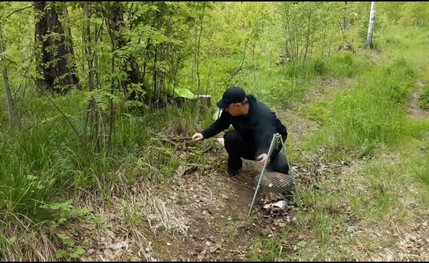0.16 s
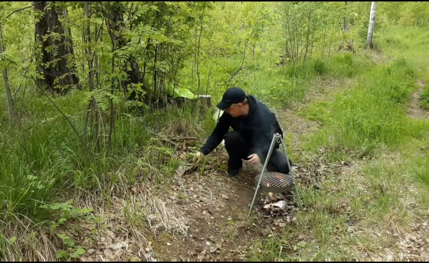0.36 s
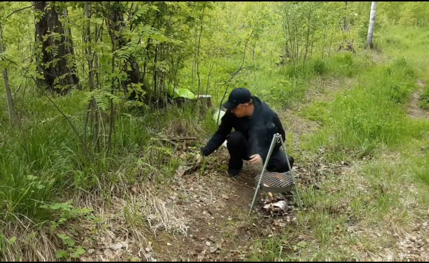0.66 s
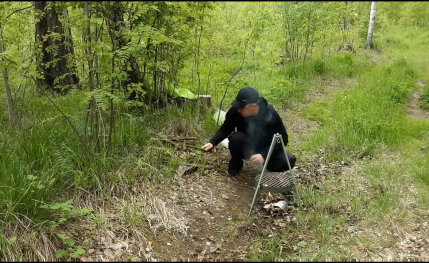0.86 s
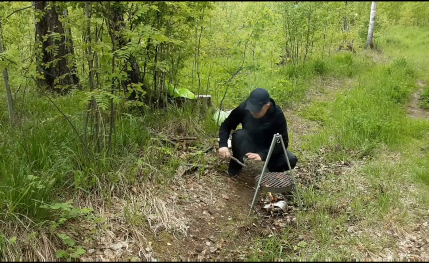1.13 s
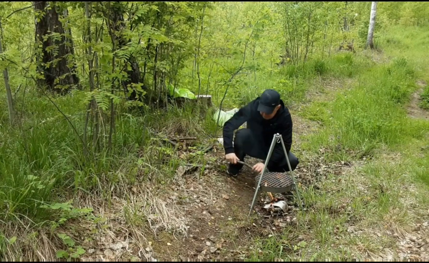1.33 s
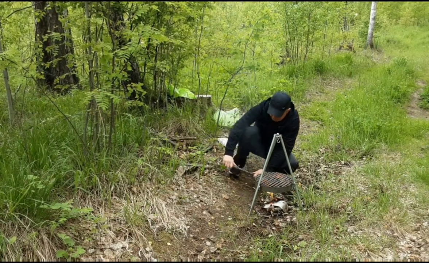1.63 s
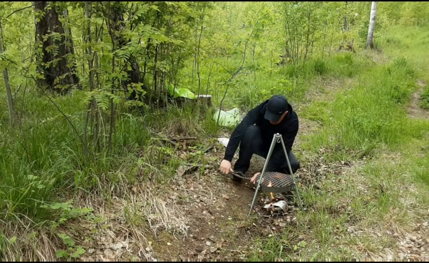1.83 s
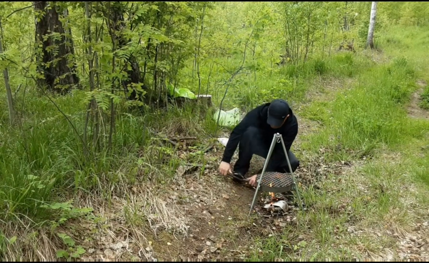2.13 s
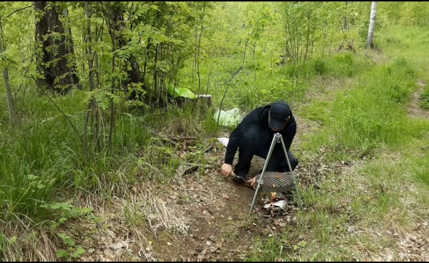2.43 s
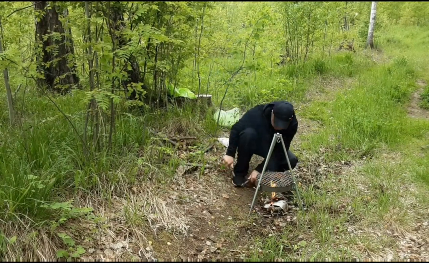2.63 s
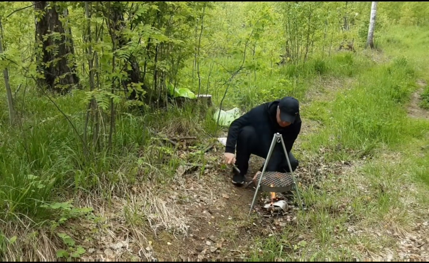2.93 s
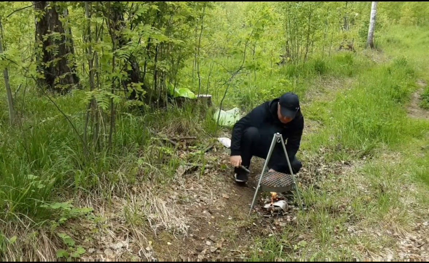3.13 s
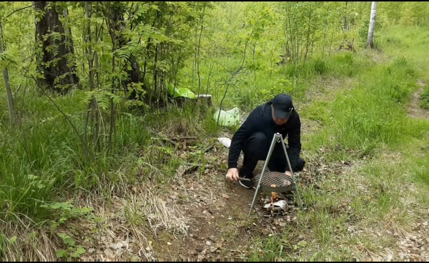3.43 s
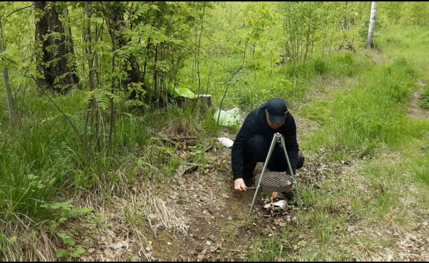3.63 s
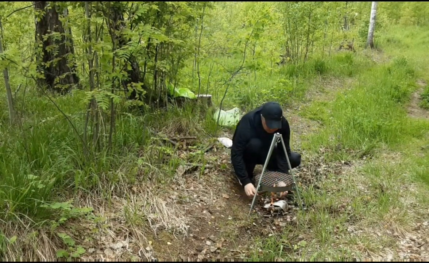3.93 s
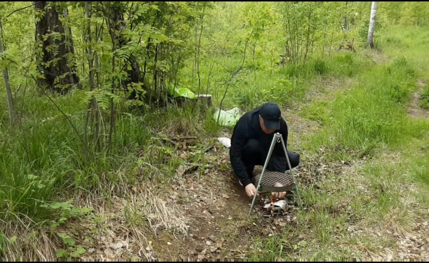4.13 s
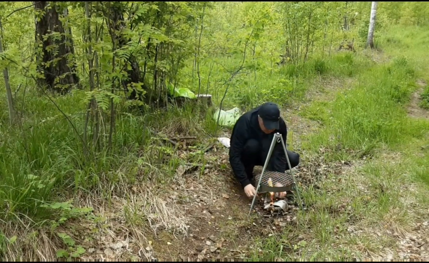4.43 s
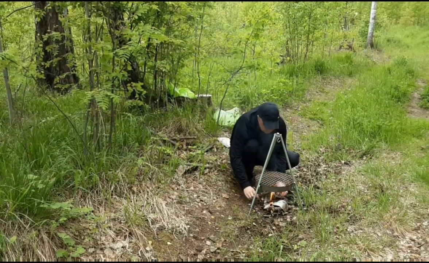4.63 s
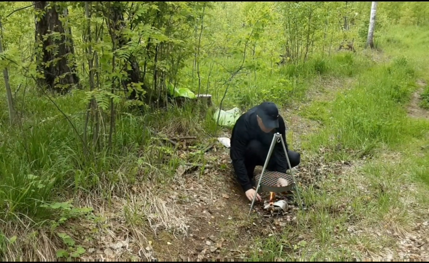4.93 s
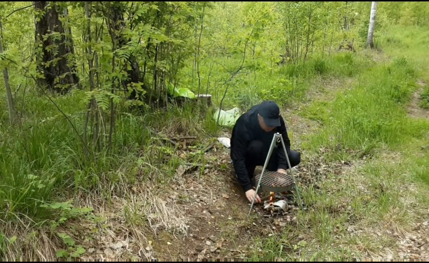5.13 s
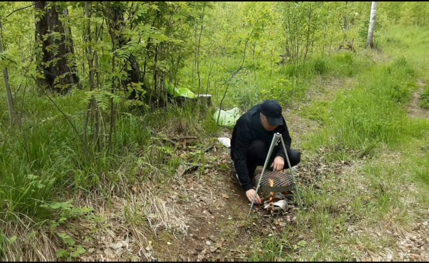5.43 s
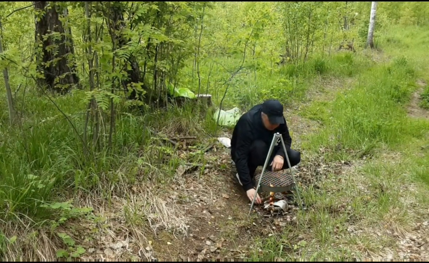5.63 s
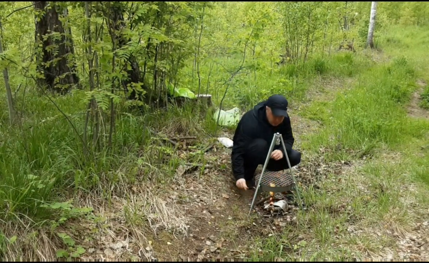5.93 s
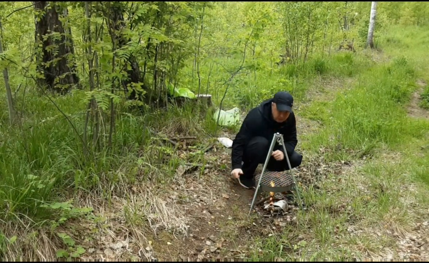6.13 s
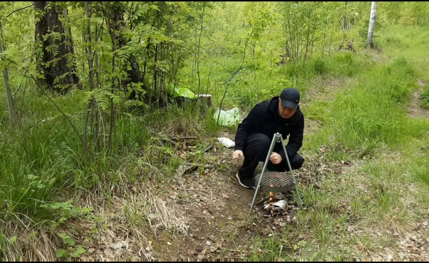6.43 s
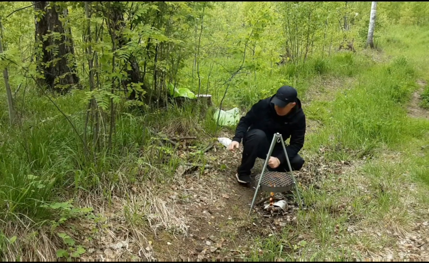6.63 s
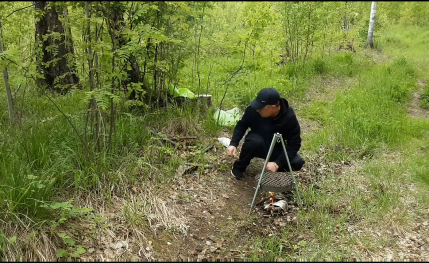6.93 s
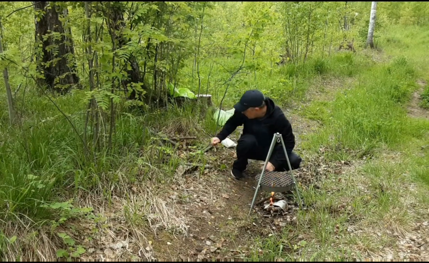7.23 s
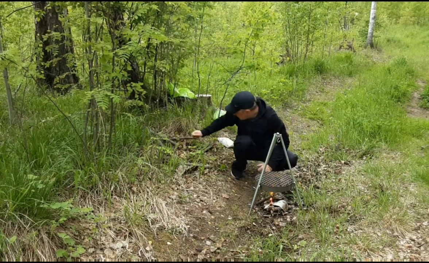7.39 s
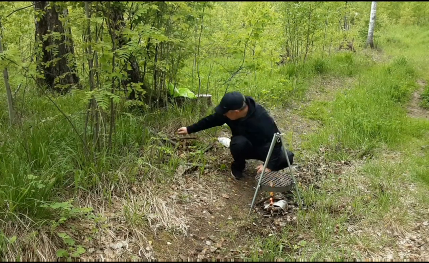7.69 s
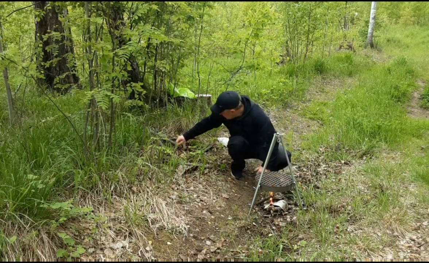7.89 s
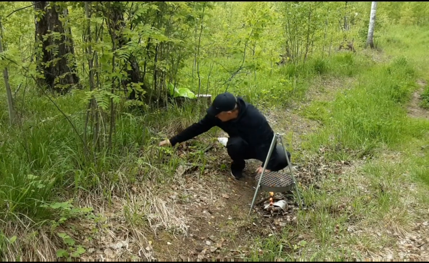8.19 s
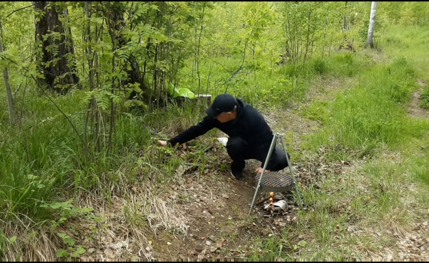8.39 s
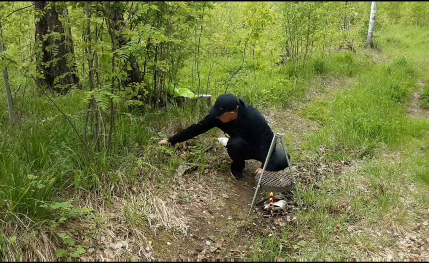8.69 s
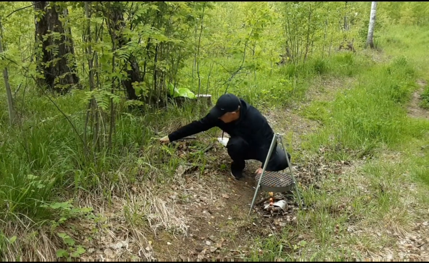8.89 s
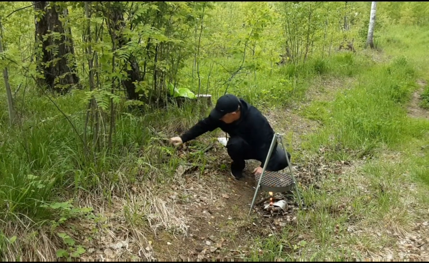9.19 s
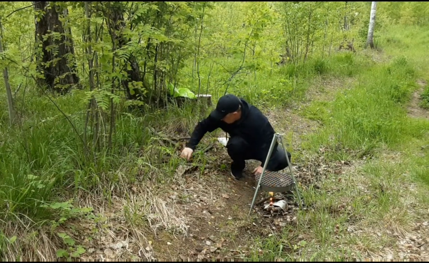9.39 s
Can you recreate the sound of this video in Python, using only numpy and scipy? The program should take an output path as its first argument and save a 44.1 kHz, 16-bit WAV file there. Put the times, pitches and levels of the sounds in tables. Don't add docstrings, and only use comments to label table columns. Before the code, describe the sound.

Quiet outdoor ambience with a far road's muffled roar and wavering engine drone. A small bird gives one short, high, downward chirp again and again, echoing lightly among trees. Nearer, leaves rustle faintly and twigs click; early small cracks cluster near one second, then one big dry snap dominates at 2.6, a lesser crack follows at 3.6, and sparse light ticks continue to the end.

```python
import sys
import numpy as np
from scipy import signal
from scipy.fft import rfft, irfft, next_fast_len
from scipy.io import wavfile

SR = 44100
rng = np.random.default_rng(int(sys.argv[2]) if len(sys.argv) > 2 else 0)


def voltage_ratio(level):
    return 10 ** (np.asarray(level, float) / 20)


def persist_wave(psi):
    counts = np.round(np.clip(psi, -1, 1) * 32767).astype(np.int16)
    wavfile.write(sys.argv[1], SR, np.atleast_2d(counts).T)


N = 421155

# f/Hz, density/dB
ROAR_SPECTRUM = [(15, -46), (25, -20), (60, 0.5), (76, -2.5), (103, -9.5), (150, -8.5), (182, -13),
                 (242, -9.5), (314, -10), (374, -6), (417, -8.5), (632, -5), (1110, -9.5), (3320, -45),
                 (4600, -47), (5980, -46), (10100, -120)]
# t/s, level/dB
TRAFFIC_LEVEL = [(0.0, -43.5), (0.5, -44), (1.6, -44), (2.7, -44), (2.95, -45.5), (3.6, -45), (4.15, -43),
                 (4.47, -44), (4.75, -43.5), (5.4, -44), (6.8, -44), (8.2, -45), (8.8, -45.5),
                 (9.55, -45.5)]
# middle t/s, length/s, level/dB
CAR_HISSES = [(0.1, 0.66, -71), (0.9, 0.41, -69), (1.35, 0.54, -69), (2.0, 0.96, -72.5), (2.74, 0.2, -74),
              (4.25, 0.52, -68), (5.05, 0.3, -74), (6.9, 0.42, -70.5), (8.0, 1, -75), (8.75, 0.39, -69.5),
              (9.2, 0.3, -71)]
# middle t/s, length/s, drone level/dB
ENGINE_PULLS = [(0.1, 0.48, -46), (0.9, 0.25, -51), (1.33, 0.34, -42.5), (1.92, 0.56, -39.5),
                (2.65, 0.37, -42.5), (3.2, 0.25, -47), (3.8, 0.83, -48), (4.8, 0.46, -49),
                (5.4, 0.4, -45.5), (6.5, 0.4, -48), (8.0, 0.67, -47), (8.95, 0.2, -53), (9.5, 0.22, -47)]
# middle t/s, length/s, overtone level/dB
ENGINE_REVS = [(0.2, 0.36, -52.5), (1.75, 0.71, -58), (2.6, 0.22, -54), (4.8, 0.4, -55), (6.85, 0.24, -64),
               (7.7, 0.97, -56.5), (8.72, 0.2, -59), (9.3, 0.45, -49)]
# start t/s, end t/s, f/Hz, level/dB
GEAR_WHINES = [
    (0.5, 2.4, 667, -58),
    (1.6, 2.77, 501, -62),
    (2.8, 3.5, 503, -55.5),
]
HISS_IDLE_DB, DRONE_IDLE_DB, OVERTONE_IDLE_DB = -68, -58, -65

# t/s, rustle level/dB, crisp level of the hand's nearer leaves/dB
LEAF_STIR = [(0.0, -66, -72), (0.6, -65.5, -72.5), (1.09, -67, -76), (1.45, -63.5, -77), (1.78, -68, -75.5),
             (2.5, -69, -77), (2.79, -63, -74), (2.93, -71, -77.5), (3.75, -70.5, -75.5), (4.15, -65, -77),
             (4.45, -68, -76), (7.5, -69, -77), (8.32, -73, -75), (8.78, -74, -67.5), (9.05, -71, -71.5),
             (9.55, -72, -78)]
# f/Hz, density/dB
LEAF_SPECTRUM = [(1470, -42), (2500, -18.5), (2900, -34), (3180, -22.5), (3520, 1), (5650, 6.5), (7190, 10),
                 (8600, 2.5), (10700, -10.5), (11200, -11.5), (14700, -12.5), (16000, -9)]
# middle t/s, length/s, level/dB, lowest f/Hz, highest f/Hz
LEAF_SHUFFLES = [(0.4, 0.4, -74, 8000, 11700), (2.398, .05, -66, 6800, 8600),
                 (4.02, 0.094, -64, 7240, 8300), (.722, 0.027, -60.5, 2500, 11500),
                 (0.828, .05, -68, 6000, 14000), (1.482, .06, -66, 4000, 15000),
                 (1.543, .1, -72, 5000, 15000), (1.767, .03, -68, 6000, 11000),
                 (2.26, 0.034, -68, 6600, 14000), (3.616, 0.022, -58, 7500, 11500),
                 (4.22, .22, -70, 5000, 9900), (6.875, 0.04, -65, 4000, 6500),
                 (7.0, 0.063, -65, 4000, 6460), (7.187, 0.057, -66, 4000, 6500),
                 (8.71, 0.02, -65, 6000, 15500), (8.85, .3, -76, 8000, 15500),
                 (9.153, 0.06, -65, 5000, 15500)]

# t/s, length/s, initial f/Hz, final f/Hz, level/dB
FAR_BIRD_GLIDES = [
    (1.95, 0.1, 6100, 5900, -76),
    (2.35, 0.07, 6840, 8000, -76),
    (3.65, 0.06, 6450, 6520, -75),
    (4.7, 0.06, 5700, 5150, -76),
    (8.715, 0.035, 2900, 2860, -75),
    (5.29, 0.04, 8800, 8400, -77),
    (5.46, 0.06, 8500, 8300, -76),
    (5.63, 0.05, 6500, 6500, -76),
    (8.175, 0.04, 3180, 3170, -78),
]
FAR_EDGE_DB = -3.0
# t/s, length/s, final f/Hz, fall time/s, level/dB
WARBLER_CHIRPS = [(0.477, 0.046, 5030, 0.018, -53.5), (1.281, 0.058, 4800, 0.012, -57.5),
                  (2.056, 0.04, 4880, 0.014, -58), (2.721, 0.048, 4960, 0.0166, -58),
                  (3.427, 0.062, 4880, 0.015, -58), (4.083, 0.05, 4870, 0.01, -55.5),
                  (4.781, 0.036, 4840, 0.015, -56.5), (5.508, 0.065, 4905, 0.019, -58.5),
                  (6.209, 0.058, 4825, 0.016, -58.5), (6.939, 0.036, 4950, 0.015, -57.5),
                  (7.555, 0.064, 4890, 0.023, -59.5), (8.394, 0.048, 4960, 0.017, -60),
                  (9.246, 0.066, 4820, 0.011, -56.5)]
CHIRP_TOP_HZ, CHIRP_SHELF_HZ, CHIRP_BEND = 5810, 5030, 2.15
CHIRP_STEP_S, CHIRP_STEP_WIDTH_S = 0.0293, 0.0027
CHIRP_ENTRY_DB, CHIRP_EXIT_DB = -6.0, -3.0

# f/Hz, t60/s
WOOD_DECAY = [
    (300, 0.15),
    (1500, 0.054),
    (4000, 0.48),
    (8000, 0.45),
    (15000, 0.33),
]
# f/Hz, level/dB
WOOD_LEVEL = [
    (300, 6),
    (2000, 1.5),
    (4500, -1.5),
    (7200, -5.5),
    (11000, 1.5),
    (15000, -3),
]
NEAR_ECHO_DB, FAR_ECHO_DB, FAR_ECHO_CUT_HZ = -5.0, -6.0, 4950

# t/s, peak level/dB, woody part/dB, crisp part/dB
TWIG_CRACKS = [(0.2095, -48.5, -21, -16), (0.835, -46.5, -6, -20), (0.9545, -46, -5, -26),
               (0.9899, -36, -35, -32), (1.0076, -50, -16, -33), (1.0692, -45, 0, -26),
               (1.1253, -55, -7, -19), (1.164, -50, 2, -30), (2.5886, -8, -13.5, -20),
               (2.7716, -48, -8, -22), (2.954, -51, -14, -12), (3.098, -57, -18, -4),
               (3.6030, -32.5, -6.5, -17), (4.153, -43, -10, -22), (4.648, -47, -24, -12),
               (4.6678, -53, -15, -21), (4.9434, -42, -20, -16), (6.5176, -53, -11, -11),
               (6.554, -48, -15, -10), (6.8568, -48, -11, -18), (6.9597, -51, -9, -16),
               (7.1268, -38, -19, -16), (7.1726, -49, -17, -12), (7.1965, -48, -14, -14),
               (7.4012, -51, -11, -11), (7.5188, -48, -10, -16), (8.5001, -48, -16, -27),
               (9.1221, -44.5, -9, -13)]
# t/s, peak level/dB
FURTHER_CRACKS = [(0.5926, -50), (1.4413, -50), (1.6546, -48), (2.1141, -52), (2.143, -57), (3.5319, -50),
                  (3.902, -53), (4.219, -54), (4.3156, -52), (4.5002, -51), (4.5456, -56), (5.695, -54),
                  (5.7254, -57), (5.7885, -55), (5.9125, -59), (6.3974, -56), (6.4807, -56), (6.6124, -50.5),
                  (7.3422, -57), (8.3145, -59), (8.4088, -53), (8.6233, -56), (8.6677, -56), (8.6966, -51)]
TICK_WOODY_DB, TICK_CRISP_DB = -15, -15
STRAY_TICKS_PER_S, STRAY_DB, STRAY_SPREAD_DB = 5, -59.0, 2.0
# t/s, peak level/dB, f/Hz
TWIG_KNOCKS = [(0.7173, -43, 2170), (0.9542, -35, 2560), (1.1089, -45, 2200), (1.277, -44, 2030),
               (1.481, -44, 2290), (2.5616, -57, 2100), (2.7147, -39, 2100), (4.3665, -45, 2170),
               (6.7391, -45, 2600), (6.7825, -45, 2020), (7.4639, -54, 2300)]
# t/s, level/dB
STICK_BLOWS = [
    (2.5891, -10),
    (2.5945, -19.5),
]
# f/Hz, level/dB, t60/s
STICK_MODES = [
    (486, -4.5, 0.026),
    (845, -5.5, 0.028),
    (1174, -7.5, 0.025),
    (1570, -4, 0.0049),
    (2250, -116, 0.0014),
    (4000, -20, 0.0036),
]
# t/s, level/dB, f/Hz, length/s
SOIL_THUDS = [
    (2.6003, -19.5, 172, .0115),
    (4.1258, -29, 620, .004),
]
BOUNCE_S, BOUNCE_DB, BOUNCE_CUT_HZ = .0027, -11, 9000

# f/Hz, rms level/dB
ELECTRONIC_WHINES = [
    (10341, -91),
    (14277, -92),
]


def unit(x):
    return x / np.sqrt(np.mean(x ** 2) + 1e-20)


def in_time(rows):
    s, *columns = np.transpose(rows)
    return [np.interp(np.arange(N) / SR, s, c) for c in columns]


def at_hz(points, hz):
    table_hz, table_db = np.array(points)[:, 0], np.array(points)[:, 1]
    return np.interp(np.log(hz), np.log(table_hz), table_db)


def drift(rate):
    r = np.exp(-80 * np.pi * rate / SR)
    slow = signal.lfilter([1], [1, -2 * r, r * r], rng.standard_normal(N // 40 + 2002))[2000:]
    return np.interp(np.arange(N) / 40, np.arange(len(slow)), unit(slow))


def swells(rows, idle_db):
    t = np.arange(N) / SR
    rises = sum(voltage_ratio(db) ** 2 * np.exp(-(2 * (t - s) / length) ** 2) for s, length, db in rows)
    return np.sqrt(voltage_ratio(idle_db) ** 2 + rises)


def ring(clicks, hz, t60):
    r, w = voltage_ratio(-60 / (t60 * SR)), 2 * np.pi * hz / SR
    return signal.lfilter([0, np.sin(w)], [1, -2 * r * np.cos(w), r * r], clicks + 1e-18)


def clicks_at(seconds, db):
    out = np.zeros(N)
    np.add.at(out, np.round(np.asarray(seconds) * SR).astype(int), voltage_ratio(np.asarray(db)))
    return out


def coloured(source, spectrum):
    size = next_fast_len(N)
    hz = np.maximum(np.fft.rfftfreq(size, 1 / SR), 1)
    inside = (hz > spectrum[0][0]) & (hz < spectrum[-1][0])
    return unit(irfft(rfft(source, size) * voltage_ratio(at_hz(spectrum, hz)) * inside, size)[:N])


def sieve(x, order, kind, hz):
    return signal.sosfilt(signal.butter(order, hz, kind, fs=SR, output="sos"), x)


def band(x, low_hz, high_hz, order=2):
    return sieve(x, order, "band", [low_hz, min(high_hz, .45 * SR)])


def road():
    roar_db, = in_time(TRAFFIC_LEVEL)
    tyres = coloured(rng.standard_normal(N), ROAR_SPECTRUM)
    hiss = signal.sosfiltfilt(signal.butter(3, 1700, "high", fs=SR, output="sos"), tyres)
    roar = (tyres - hiss) * voltage_ratio(roar_db + 0.35 * drift(6.3))
    roar += unit(hiss) * swells(CAR_HISSES, HISS_IDLE_DB) * voltage_ratio(4.5)
    drone = unit(ring(rng.standard_normal(N), 62.1, 0.67)) * swells(ENGINE_PULLS, DRONE_IDLE_DB) * voltage_ratio(-6.5)
    overtone = unit(ring(rng.standard_normal(N), 146.7, 0.36))
    overtone = overtone * swells(ENGINE_REVS, OVERTONE_IDLE_DB) * voltage_ratio(-3.5)
    return roar + drone + overtone + gears()


def gears():
    out = np.zeros(N)
    for start, end, hz, db in GEAR_WHINES:
        passing = np.interp(np.arange(N) / SR, [start, start + 0.16, end - .15, end], [0, 1, 1, 0])
        phase = 2 * np.pi * np.cumsum(hz + 2.0 * drift(3.0)) / SR
        out += np.sqrt(2) * np.sin(phase) * voltage_ratio(db + 3.0 * drift(4.0)) * passing
    return out


def rustle():
    rustle_db, crisp_db = in_time(LEAF_STIR)
    sizes = voltage_ratio(4.5 * np.minimum(rng.exponential(1, N), 5)) * rng.choice([-1, 1], N)
    grains = sizes * (rng.random(N) < 600 * voltage_ratio(5 * drift(8.0)) / SR)
    leaves = coloured(rng.standard_normal(N) + 0.37 * unit(grains), LEAF_SPECTRUM)
    crisp = unit(sieve(leaves, 4, "high", 9700))
    soft = unit(sieve(leaves, 4, "low", 9700))
    return soft * voltage_ratio(rustle_db - 3.0 + 1.56 * drift(28.0)) + crisp * voltage_ratio(crisp_db + 1.2 * drift(10.0))


def shuffles():
    out = np.zeros(N)
    for s, length, db, low_hz, high_hz in LEAF_SHUFFLES:
        size = round(2 * length * SR)
        grit = rng.standard_normal((2, 40000))[:, :size]
        crackle = band(grit[0] * voltage_ratio(5.0 * grit[1]), low_hz, high_hz)
        out[round(s * SR) - size // 2:][:size] += unit(crackle) * np.hanning(size) * voltage_ratio(db)
    return out


def wood(x, gap, stretch):
    t, tail = np.arange(SR) / SR, 0
    edges = 200 * 2 ** np.arange(0, 6.6, .5)
    for low, high in zip(edges, edges[1:]):
        hz = np.sqrt(low * high)
        level_db = at_hz(WOOD_LEVEL, hz) - t * 60 / stretch / at_hz(WOOD_DECAY, hz)
        tail = tail + band(rng.standard_normal(SR), low, high) * voltage_ratio(level_db)
    tail = tail * np.clip(t / gap, 0, 1)
    return signal.fftconvolve(x, tail / np.sqrt(np.sum(tail ** 2)))[:N]


def far_bird_calls():
    calls = []
    for s, length, from_hz, to_hz, db in FAR_BIRD_GLIDES:
        middle = (s + length / 2, (from_hz + to_hz) / 2, db)
        calls.append([(s, from_hz, db + FAR_EDGE_DB), middle, (s + length, to_hz, db + FAR_EDGE_DB)])
    return calls


def warbler_calls():
    share = np.linspace(0, 1, num=24)
    swell_db = np.interp(share, [0, .4, 1], [CHIRP_ENTRY_DB, -1.5, CHIRP_EXIT_DB])
    calls = []
    for s, length, hz, fall, db in WARBLER_CHIRPS:
        t = share * length
        drop = (CHIRP_TOP_HZ - CHIRP_SHELF_HZ) * np.exp(-(t / fall) ** CHIRP_BEND)
        step = (CHIRP_SHELF_HZ - hz) / (1 + np.exp((t - CHIRP_STEP_S) / CHIRP_STEP_WIDTH_S))
        calls.append(np.transpose([s + t, hz + step + drop, db + swell_db]))
    return calls


def whistles(calls, flutter_db):
    out, flutter = np.zeros(N), voltage_ratio(flutter_db * drift(140.0))
    for call in calls:
        s, hz, db = np.transpose(call)
        at = np.arange(round(s[0] * SR), round(s[-1] * SR))
        edges = signal.windows.tukey(len(at), .25)
        phase = 2 * np.pi * np.cumsum(np.interp(at / SR, s, hz)) / SR
        out[at] += np.sqrt(2) * voltage_ratio(np.interp(at / SR, s, db)) * edges * np.sin(phase)
    return out * flutter


def birds():
    song = whistles(warbler_calls(), flutter_db=3.5) + whistles(far_bird_calls(), flutter_db=4.5)
    perch_echo = voltage_ratio(NEAR_ECHO_DB) * wood(song, gap=0.0016, stretch=0.21)
    song = voltage_ratio(0.5) * (song + perch_echo)
    dulled = sieve(song, 12, "low", FAR_ECHO_CUT_HZ)
    swaying = voltage_ratio(FAR_ECHO_DB + 3.0 * drift(40.0))
    return song + wood(dulled, gap=0.02, stretch=1.3) * swaying


def thud():
    out = np.zeros(N)
    for s, db, hz, length in SOIL_THUDS:
        t = np.arange(round(length * SR)) / SR
        push = np.sin(np.pi * t / length) ** 0.46
        out[round(s * SR):][:len(t)] += voltage_ratio(db) * push * -np.cos(2 * np.pi * hz * t)
    return out


def all_cracks():
    count = round(STRAY_TICKS_PER_S * N / SR)
    where, size = rng.random(count), rng.standard_normal(count)
    stray = list(zip(where * (N / SR - .1), STRAY_DB + STRAY_SPREAD_DB * size))
    ticks = [(s, db, TICK_WOODY_DB, TICK_CRISP_DB) for s, db in [*FURTHER_CRACKS, *stray]]
    return [*TWIG_CRACKS, *ticks]


def cracks(table, fibrous):
    s, db, woody_db, crisp_db = np.transpose(table)
    after = np.arange(200)
    tearing = np.exp(-after / 14) + .5 * np.exp(-after / 80)
    at = np.round((s + .0009) * SR).astype(int)[:, None] + after
    parts = np.zeros((3, N))
    for part, gain_db in zip(parts, (db + 22.5, db + woody_db + 24.0, db + crisp_db + 25.0)):
        fibres = fibrous * rng.standard_normal(at.shape) * tearing
        fibres[:, 0] = 1
        fibres /= np.sqrt(np.sum(fibres ** 2, axis=1, keepdims=True))
        np.add.at(part, at, fibres * voltage_ratio(gain_db)[:, None])
    bright = band(parts[0], 6250, 8270) - voltage_ratio(-16.5) * band(parts[0], 9800, 10300)
    woody, crisp = band(parts[1], 1700, 4500), band(parts[2], 10100, 14500)
    knocks = sum(ring(clicks_at([t + 0.0007], db - 1.0), hz, 0.0058) for t, db, hz in TWIG_KNOCKS)
    return bright - woody + crisp + band(knocks, 1200, 4500)


def stick():
    blow = signal.lfilter([.4], [1, -.6], clicks_at(*np.transpose(STICK_BLOWS)))
    return sum(ring(blow, hz, t60) * voltage_ratio(db) * (-1) ** k for k, (hz, db, t60) in enumerate(STICK_MODES))


def gathering():
    body, table = stick(), all_cracks()
    near = cracks(table, fibrous=.15) + body
    bounce = sieve(np.roll(near, round(BOUNCE_S * SR)), 1, "low", BOUNCE_CUT_HZ)
    scattered = wood(cracks(table, fibrous=0) + body, gap=0.0033, stretch=1.0)
    return near + voltage_ratio(BOUNCE_DB) * bounce + thud() + voltage_ratio(-11) * scattered


def scene():
    return (road() + rustle() + shuffles() + birds() + gathering())[None]


def roll_off(x):
    return signal.sosfilt(signal.butter(12, 16790, fs=SR, output="sos"), x)


def record(dry):
    whine = sum(voltage_ratio(db) * unit(ring(rng.standard_normal(N), hz, .06)) for hz, db in ELECTRONIC_WHINES)
    whine = whine * np.clip(np.arange(N) / SR - 2.2, 0, 1)
    bass_cut = signal.butter(4, 38, "high", fs=SR, output="sos")
    top_cut = signal.cheby2(14, 35, 15950, fs=SR, output="sos")
    mix = signal.sosfilt(np.vstack([bass_cut, top_cut]), dry + whine)
    return roll_off(mix)


dry = scene()
out = record(dry)
persist_wave(out)
```